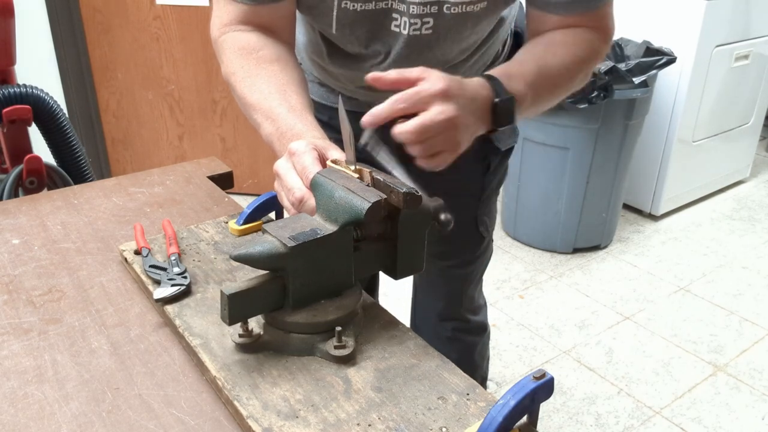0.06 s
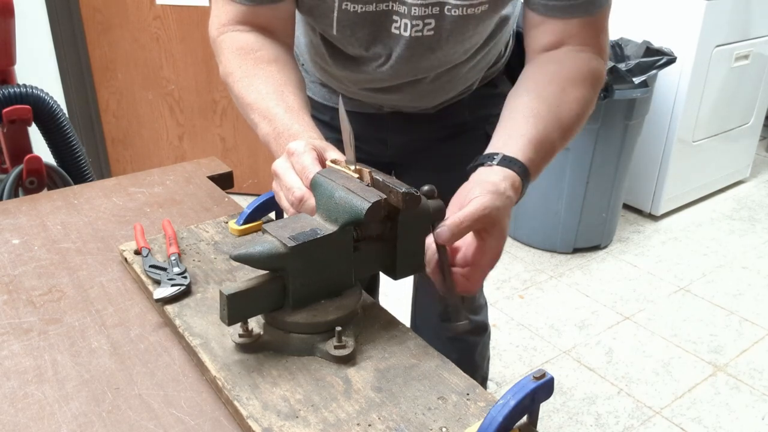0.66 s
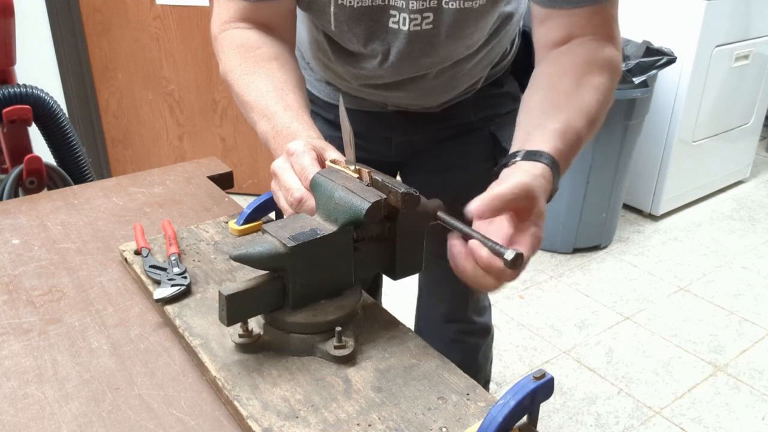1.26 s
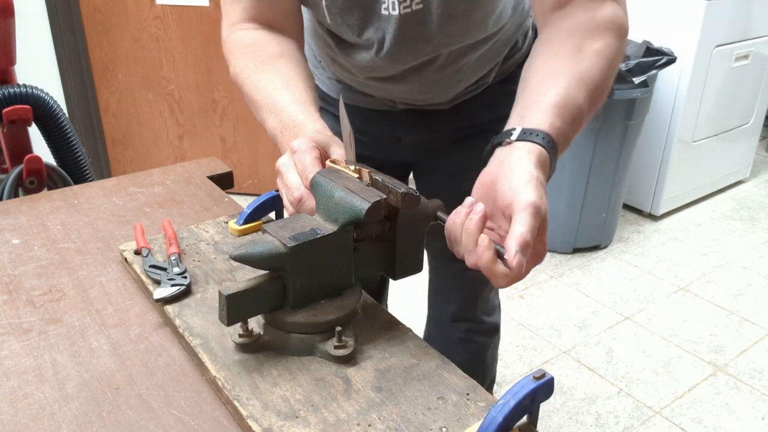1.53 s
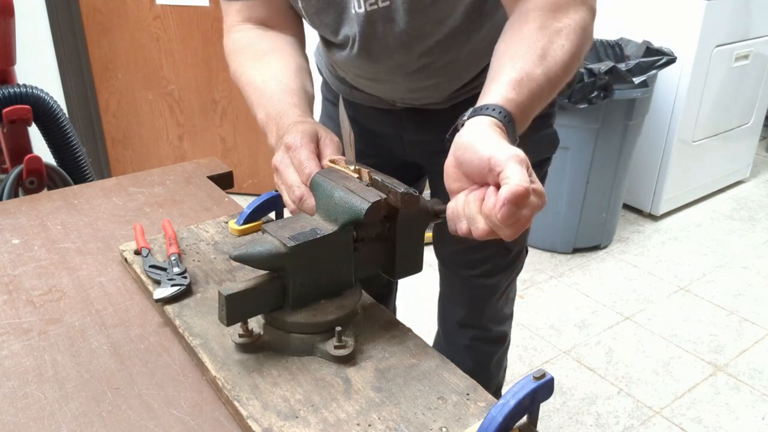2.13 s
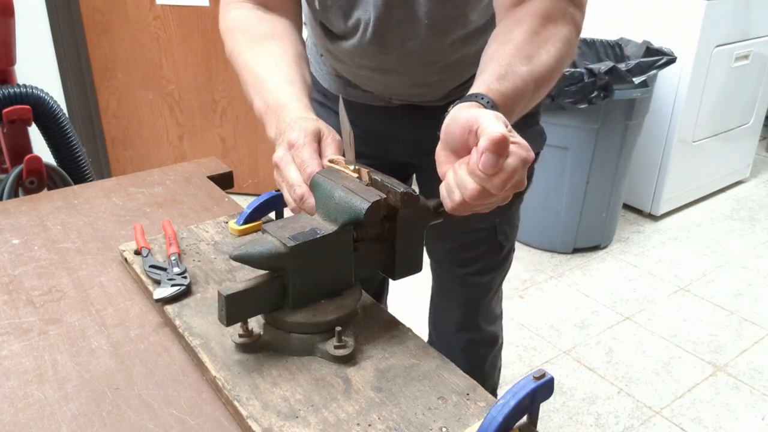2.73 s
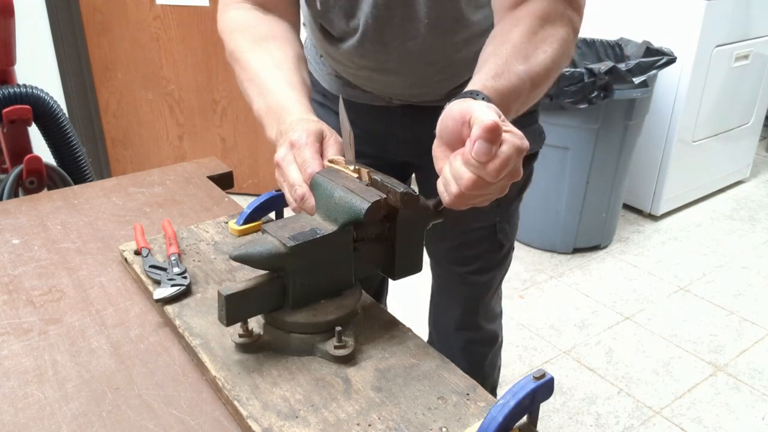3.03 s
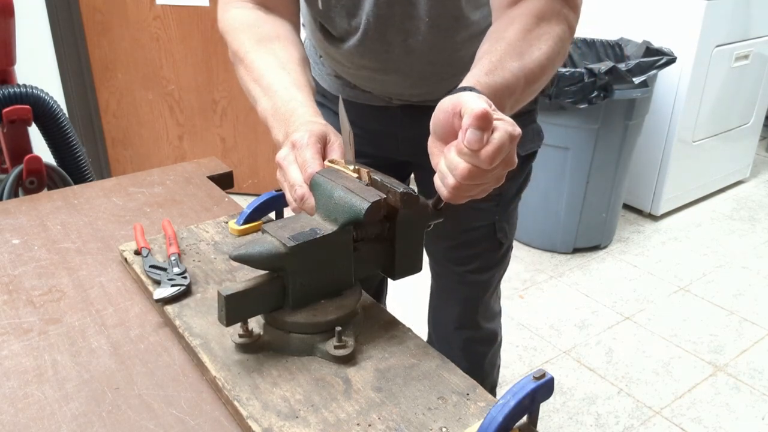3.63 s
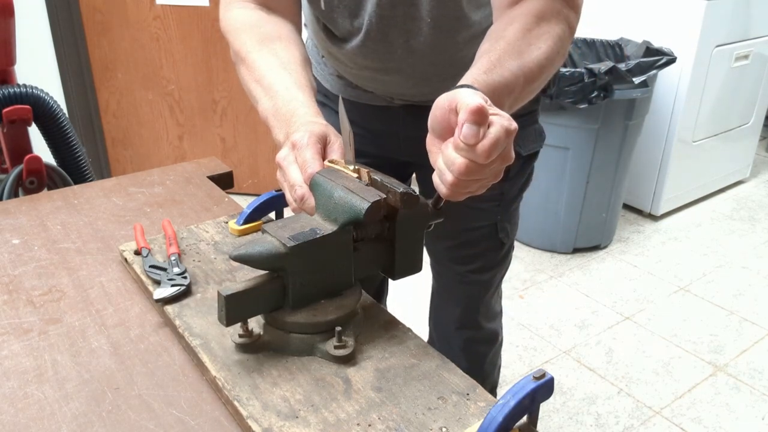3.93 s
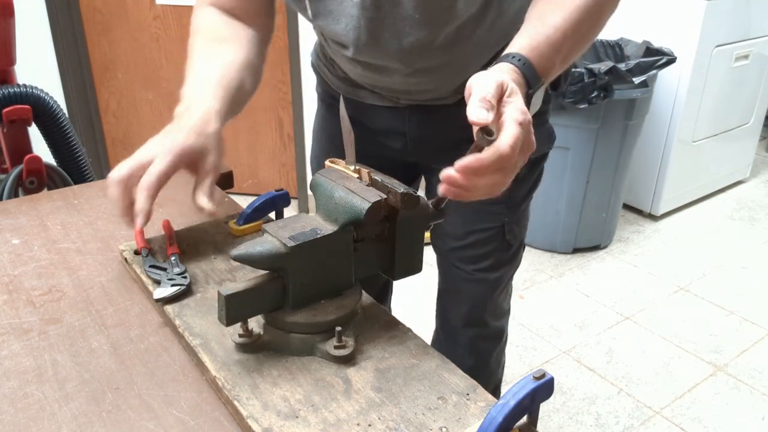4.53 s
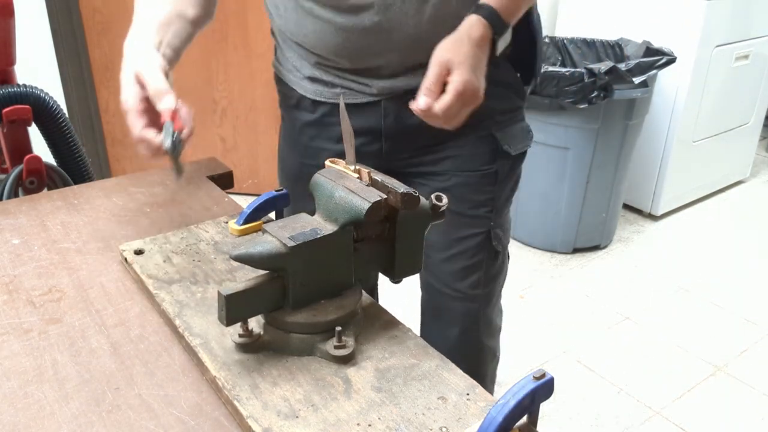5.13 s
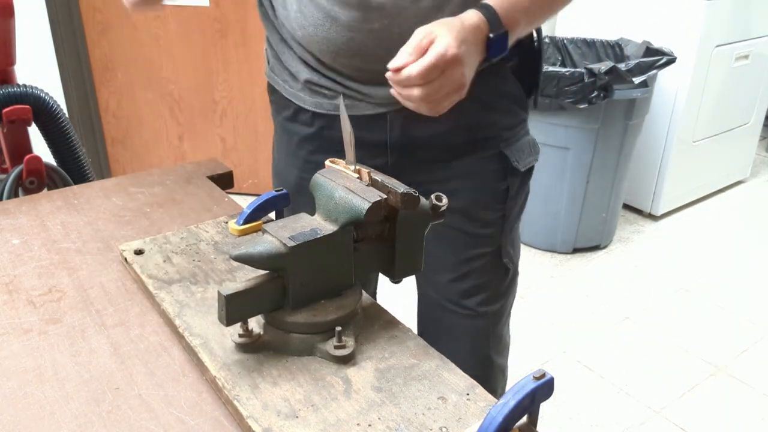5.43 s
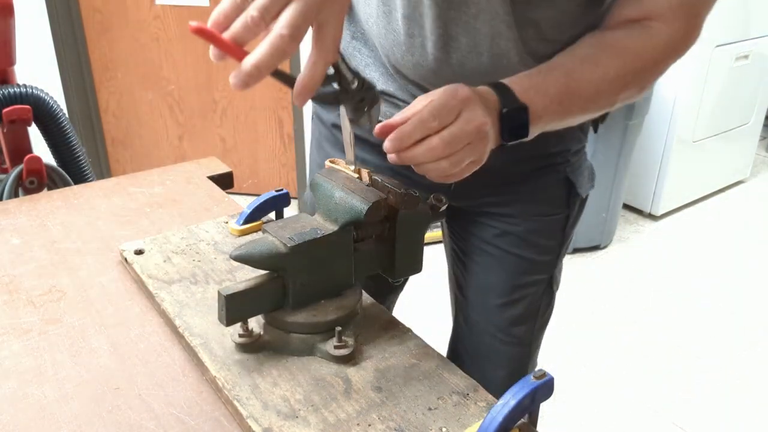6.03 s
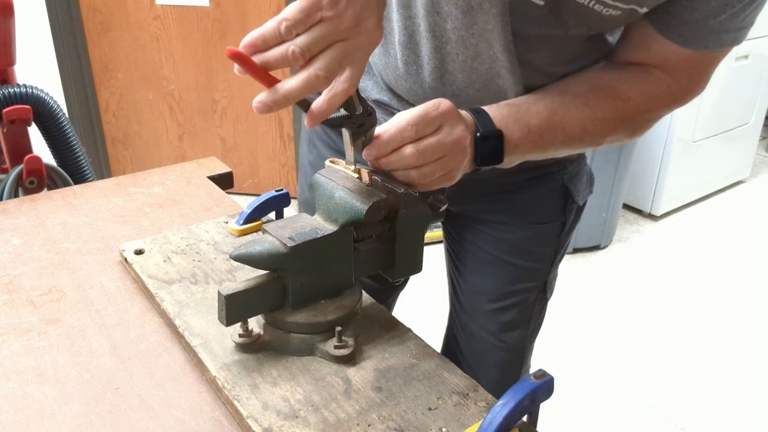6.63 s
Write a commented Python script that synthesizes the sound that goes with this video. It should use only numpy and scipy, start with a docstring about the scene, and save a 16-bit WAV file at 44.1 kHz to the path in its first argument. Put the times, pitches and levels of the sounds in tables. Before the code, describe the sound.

A cast-iron bench vise is tightened in a small workshop with a short echo, over faint electrical hum and air noise. From the start to about 1.4 seconds, its screw knocks irregularly, with light handle clinks in the first half second and short, low judders, strongest around 0.7 and 1.1 seconds. It then turns much quieter: soft, dull bumps of the vise on its wooden board are scattered from 1.7 to 4.7 seconds, with one very brief, high squeak at 2.3 seconds. From about 4.6 seconds the steel handle scrapes through its hole, ringing slightly, and hits its stop just before 5 seconds with a loud, bright clang and a knock. From 5.3 seconds, pliers rub faintly as they are handled, then make several light steel clicks against the clamped knife blade between about 6.2 and 6.9 seconds.

```python
"""A small workshop: a knife is clamped in a cast-iron bench vise, over faint mains hum and air noise.
Hands shift on the vise. The screw knocks in its slack, judders as it sticks and slips, and squeaks once.
The loaded vise bumps on its board; the steel handle scrapes through its hole and clangs on its stop.
Pliers are then picked up, rub, and click against the blade.
Contact forces drive each object's modes; the room adds a short diffuse echo."""
import sys
import numpy as np
from scipy import signal
from scipy.fft import rfft, irfft
from scipy.io import wavfile
from scipy.ndimage import uniform_filter1d

SR = 44100
rng = np.random.default_rng(int(sys.argv[2]) if len(sys.argv) > 2 else 0)


def put_to_file(sound):
    """Save the sound as 16-bit audio at rate SR, in the file named by the first command-line argument."""
    columns = np.atleast_2d(sound).T  # one column per channel
    safe = np.clip(columns, -1, 1)
    whole_steps = np.round(safe * 32767)
    wavfile.write(sys.argv[1], SR, whole_steps.astype(np.int16))


N = 302967
T = np.arange(int(.7 * SR)) / SR  # time within one event [s]

# hand pressure on the vise: (time [s], relative level [dB])
HAND_LEVELS = [(0, -45), (0.55, -73.5), (0.95, -53), (1.349, -53.5), (1.598, -66.5), (2.752, -71),
               (3.35, -75), (3.7, -83), (4.22, -74), (4.35, -65.5), (4.55, -62.5), (4.8, -43.5),
               (5.2, -63.5), (6.1, -81)]
# impacts: (time [s], relative strength [dB], hardness = edge over body [dB])
VISE_KNOCKS = [(0.010, -30.5, -23), (0.112, -42, -33), (0.157, -43, -31), (0.193, -24, -8),
               (0.212, -22.5, -10.5), (0.228, -30, -31), (0.248, -22.5, -19), (0.287, -31.5, -29),
               (0.534, -29.5, -33), (0.572, -43, -28), (0.780, -15, -11.5), (0.827, -17, -19.5),
               (1.061, -15, -3.5), (1.391, -25, -14), (4.383, -50, 2.5), (4.953, -16.5, 2),
               (4.963, -14.5, -22.5)]
HANDLE_CLANGS = [(0.212, -33.5, -5), (0.350, -41, -14), (0.412, -29.5, -4.5), (4.963, -13.5, 5)]
BOARD_BUMPS = [(1.741, -52, -11), (2.040, -56.5, -11), (2.097, -56.5, -9), (2.280, -62.5, -27),
               (2.316, -60, 11), (2.757, -59.5, -20), (3.123, -63, -17.5), (3.202, -46.5, -8.5),
               (3.294, -55, -23.5), (3.418, -52.5, -20), (4.277, -63, -24), (4.439, -47, -6),
               (4.691, -42, -34.5), (4.724, -37, -24)]
STEEL_CLICKS = [(4.333, -70.5, 17.5), (5.494, -43.5, -20), (5.840, -59.5, 25), (5.882, -55.5, 19.5),
                (6.165, -46.5, -26.5), (6.445, -40, 4), (6.456, -36, -11), (6.621, -45.5, -5.5),
                (6.851, -43.5, -3.5)]
# stick-slip bursts: (time [s], length [s], slip rate [Hz], thump [dB], body [dB], edge [dB])
SCREW_JUDDERS = [(0.259, 0.042, 148, -19.5, -30.5, -41), (0.591, 0.039, 177, -32, -62, -76.5),
                 (0.71, 0.13, 162, -9, -20.5, -30), (1.052, 0.047, 225, -14.5, -9.5, -21),
                 (4.564, 0.061, 295, -41.5, -63, -72)]
# friction strokes: (time [s], length [s], strength [dB], hardness [dB])
RUB_STROKES = [(1.284, 0.087, -81.5, 14), (5.287, 0.53, -64.5, 1), (6.157, 0.08, -57.5, -0.5),
               (6.715, 0.05, -55.5, -18.5)]
# ringing modes: (frequency [Hz], relative level [dB], t60 [s])
VISE_MODES = [(166, 0, .07), (231, -3, .08), (293, -8, .08), (439, -4, .16), (562, -12, .1), (622, -16, .1),
              (790, -16, .1), (901, -10, .13), (1055, -13, .09), (1140, -6, .13), (1324, -13, .08),
              (1567, -18, .1), (1805, -12, .08), (2100, -18, .08), (2719, -24, .1)]
HANDLE_MODES = [(1080, -7, .13), (1830, -7, .14), (2548, -9, .15), (2900, -12, .16), (4452, -14, .12),
                (4989, -8, .22), (5030, -9, .22), (5281, -12, .18), (6986, -10, .13), (9560, -7, .14),
                (9595, -7, .14), (9650, -7, .11), (12180, -17, .1), (14865, -1, .13), (15000, 6, .17),
                (15110, -4, .1)]
BOARD_MODES = [(127, -7, 0.051), (165.1, 6.5, .1), (215, -5.5, 0.48), (302, -6.5, 0.027), (590, -1, 0.34),
               (643, -19.5, 0.32)]
PLIERS_MODES = [(401.4, -14.5, 0.094), (947, 1.5, 0.11), (1500, -11, 0.14), (1514, -4, 0.11),
                (1782, 5.5, 0.017), (3770, -48, 0.026), (6400, -3, 0.065), (8800, -35, .06),
                (10300, 8.5, 0.042), (14600, -24, .05), (15200, 20, 0.047)]
HELD_BAR_MODES = [(1046, 12.5, 0.095), (2316, -0.5, 0.045), (2800, -4, .06), (4908, -19, .2),
                  (5250, -19.5, 0.26), (5900, -18.5, 0.26), (7180, -19, 0.065), (9590, -19, 0.11),
                  (12300, -23, .04), (15050, -7, .08)]
# spectra of the dense, short-lived modes: (frequency [Hz], relative density [dB])
VISE_SPECTRUM = [(40, -50.5), (75, -33.5), (112, -13.5), (163, -2.5), (270, -4), (370, -20.5), (450, -15),
                 (720, -10.5), (920, -7.5), (1400, -13.5), (1900, -20.5), (3000, -29), (3900, -28.5),
                 (6500, -39.5), (16000, -63)]
HANDLE_SPECTRUM = [(30, -24), (60, -2), (230, 2), (450, -13.5), (700, -13.5), (1100, -8), (1850, -9),
                   (3000, -16.5), (5200, -11), (8200, -20.5), (10000, -19.5), (13000, -23), (15000, -12),
                   (16000, -24)]
BOARD_SPECTRUM = [(30, -26), (60, -5.5), (110, 1), (170, 1.5), (250, -3), (390, -18.5), (520, -6),
                  (700, -15), (1000, -18.5), (2000, -31.5), (4500, -37.5), (16000, -41)]
PLIERS_SPECTRUM = [(35, -56), (60, -23), (301, -33), (417, -6.5), (715, -18), (991, 1), (1380, -1),
                   (1820, -18), (3420, -7), (5330, -6.5), (9350, -4), (10300, -11), (13600, 1),
                   (14900, -10.5), (16000, -41)]
SLIDE_SPECTRUM = [(24, -49), (40, -14), (115, -19.5), (163, 8.5), (225, -1.5), (305, -4), (382, -19.5),
                  (810, -26.5), (1020, -16), (1440, -21), (2380, -17), (3300, -31.5), (10700, -42.5),
                  (14800, -36), (16000, -38.5)]
# air noise: (frequency [Hz], relative density [dB])
AIR_SPECTRUM = [(15, -55.5), (25, -21.5), (43, -5), (64, -6.5), (89, -12), (123, -1.5), (190, -33),
                (1190, -34), (1290, -22), (1400, -36.5), (2050, -31.5), (2610, -32), (16000, -35)]
# appliance hum: (frequency [Hz], rms level [dB])
HUM_TONES = [(59.2, -73.5), (118.4, -69.5), (1281, -87)]
# room decay: (frequency [Hz], t60 [s])
ROOM_T60 = [(100, 0.5), (260, 0.25), (700, 0.33), (1840, 0.38), (4850, .38), (9200, 0.36), (15000, 0.11)]


def amp(db):
    """Decibels to gain."""
    return 10 ** (np.asarray(db) / 20)


def unit_energy(x):
    """Scale to energy 1."""
    return x / np.sqrt(np.sum(x ** 2) + 1e-20)


def unit_rms(x):
    """Scale to rms 1."""
    return unit_energy(x) * np.sqrt(len(x))


def lookup(points, hz):
    """Interpolate over log frequency."""
    point_hz, values = np.transpose(points)
    return np.interp(np.log(hz + 1), np.log(point_hz + 1), values)


def add(mix, start_s, sound):
    """Add a sound to the mix in place."""
    part = mix[max(round(start_s * SR), 0):][:len(sound)]
    part += sound[:len(part)]


def noise(spectrum, size):
    """Shaped noise, rms 1."""
    gain = amp(lookup(spectrum, np.fft.rfftfreq(size, 1 / SR)))
    return unit_rms(irfft(rfft(rng.standard_normal(size)) * gain, size))


def ring(modes):
    """Decaying sines, each building up over its first cycle; energy 1."""
    return unit_energy(sum(amp(db - 60 * T / t60_s) * np.sin(2 * np.pi * (hz * T + rng.random()))
                           * (1 - np.exp(-(hz * T) ** 2)) for hz, db, t60_s in modes))


def decay(x, t60_points):
    """Decay each band at its own rate."""
    hz, t, bands = signal.stft(x, SR, nperseg=256)
    gain = amp(-60 * t / lookup(t60_points, hz)[:, None])
    return signal.istft(bands * gain, SR, nperseg=256)[1][:len(x)]


def room(x, wet_db, build_s=0.0088):
    """Direct sound plus diffuse echo."""
    tail = decay(rng.standard_normal(len(T)), ROOM_T60) * (1 - np.exp(-(T / build_s) ** 2))
    return x + amp(wet_db) * signal.fftconvolve(x, unit_energy(tail))[:len(x)]


def body(spectrum, modes, ring_db, t60_s):
    """Impulse response: dense modes (t60_s at 150 Hz and 8 kHz) plus a few clear ones."""
    dense = decay(noise(spectrum, len(T)), [(150, t60_s[0]), (8000, t60_s[1])])
    return unit_energy(dense) + amp(ring_db) * ring(modes)


def band_levels(strength_db, hard_db, thump_db, cushion):
    """Thump, body, edge [dB]: hard contacts favour the edge, soft ones the bench."""
    return strength_db + thump_db - cushion * hard_db, strength_db, strength_db + hard_db


def balance(x, levels_db, thump_hz=350, edge_hz=2500, bench_rise_s=0.0078):
    """Set the peak 15 ms rms of bench thump, body and contact edge."""
    bands = [(thump_hz, "low"), ([thump_hz, edge_hz], "band"), (edge_hz, "high")]
    parts = [signal.sosfilt(signal.butter(3, hz, kind, fs=SR, output="sos"), x) for hz, kind in bands]
    parts[0] *= 1 - np.exp(-T / bench_rise_s)
    return sum(amp(db) * part / np.sqrt(uniform_filter1d(part ** 2, size=660).max())
               for db, part in zip(levels_db, parts))


def impacts(rows, spectrum, modes, gain_db, ring_db, t60_s, rattle_db, rattle_s, wet_db,
            thump_db, cushion):
    """Each impact: a first touch, then a quick rattle as the parts seat."""
    out = np.zeros(N)
    age = T / rattle_s
    for start_s, strength_db, hard_db in rows:
        contacts = rng.standard_normal(len(T)) * (rng.random(len(T)) < 2500 / SR)
        force = amp(rattle_db) * unit_energy(contacts * np.sqrt(age) * np.exp(-age))
        force[0] += 1
        sound = signal.fftconvolve(force, body(spectrum, modes, ring_db, t60_s))[:len(T)]
        levels_db = band_levels(strength_db, hard_db, thump_db, cushion)
        add(out, start_s, balance(room(sound, wet_db), levels_db))
    return amp(gain_db) * out


def hum_and_air(air_db=-69.5):
    """Steady appliance hum and faint air noise."""
    t = np.arange(N) / SR
    hum = sum(np.sqrt(2) * amp(db) * np.sin(2 * np.pi * (hz * t + rng.random())) for hz, db in HUM_TONES)
    return hum + amp(air_db) * noise(AIR_SPECTRUM, N)


def hands(gain_db=-2, uneven_db=6.5):
    """Uneven hand pressure makes the bench mutter."""
    level_db = np.interp(np.arange(N) / SR, *np.transpose(HAND_LEVELS))
    pressure = noise([(1, 0.5), (18, 10.0), (60, -63.0), (200, -150)], N)
    return noise(BOARD_SPECTRUM, N) * amp(gain_db + level_db + uneven_db * pressure)


def vise_knocks():
    """Knocks that ring the vise: the screw and jaw in their slack, and later the heavy blow of the handle
    reaching its stop, which thumps the bench."""
    return impacts(VISE_KNOCKS, VISE_SPECTRUM, VISE_MODES, gain_db=-5, ring_db=-9.5,
                   t60_s=(0.078, 0.056), rattle_db=1.5, rattle_s=0.01, wet_db=-10,
                   thump_db=-10.5, cushion=0.66)


def handle_clangs(flight_at_0db_s=0.075, bounce_gain_db=0.46):
    """The handle hits its stop and rebounds twice; harder hits fly longer."""
    hits = [(start_s + k * flight_at_0db_s * amp(db), db + k * bounce_gain_db, hard_db)
            for start_s, db, hard_db in HANDLE_CLANGS for k in range(3)]
    return impacts(hits, HANDLE_SPECTRUM, HANDLE_MODES, gain_db=-5.5, ring_db=-0.5,
                   t60_s=(0.025, 0.049), rattle_db=0.5, rattle_s=0.003, wet_db=-7,
                   thump_db=-4, cushion=1.0)


def screw_judder(jitter=0.04, uneven_db=2, grit=0.04, attack_s=0.03, release_s=0.0089):
    """The dry screw sticks and slips in a fast, near-regular train, shaking vise and bench."""
    out = np.zeros(N)
    for start_s, length_s, rate_hz, thump_db, body_db, edge_db in SCREW_JUDDERS:
        slip_s = (np.cumsum(1 + jitter * rng.standard_normal(40)) - .5) / rate_hz
        slips = np.zeros(len(T))
        slips[(np.clip(slip_s, 0, .5) * SR).astype(int)] = amp(uneven_db * rng.standard_normal(40))
        envelope = np.clip(np.minimum(T / attack_s, (length_s - T) / release_s), 0, 1) ** 2
        force = (slips - rate_hz / SR + grit * rng.standard_normal(len(T))) * envelope
        response = body(VISE_SPECTRUM, VISE_MODES, ring_db=-6.5, t60_s=(0.08, 0.056))
        sound = room(signal.fftconvolve(force, response)[:len(T)], wet_db=-12.5)
        dull_db = 37.5 * np.abs(np.minimum(T / length_s, 1) - 0.52)  # brightest near mid-burst
        add(out, start_s, balance(sound, (thump_db, body_db, edge_db - dull_db)))
    return out


def rubs(grain_db=3):
    """Skin and steel rub: short strokes of fine friction that swell and fade."""
    out = np.zeros(N)
    for start_s, length_s, strength_db, hard_db in RUB_STROKES:
        grains = amp(grain_db * rng.standard_normal(len(T))) * rng.standard_normal(len(T))
        force = grains * np.sin(np.pi * np.minimum(T / length_s, 1))
        response = body(PLIERS_SPECTRUM, PLIERS_MODES, ring_db=-30, t60_s=(0.0111, 0.0029))
        sound = room(signal.fftconvolve(force, response)[:len(T)], wet_db=-4)
        add(out, start_s, balance(sound, band_levels(strength_db, hard_db, thump_db=-10.5, cushion=0.46)))
    return out


def board_bumps():
    """The loaded vise bumps dully on its board."""
    return impacts(BOARD_BUMPS, BOARD_SPECTRUM, BOARD_MODES, gain_db=-7.5, ring_db=-13.5,
                   t60_s=(0.037, 0.015), rattle_db=3, rattle_s=0.0057, wet_db=-7,
                   thump_db=8.5, cushion=0.08)


def screw_squeak(start_s=2.316, attack_s=0.01518, hold_s=0.026, release_s=0.018,
                 high_hz=9122, low_hz=6810, rise_hz_per_s=7000, base_db=-22.5, swell_db_per_s=273):
    """Steel on steel sings at a high mode and a faint lower one; pitch and level climb with load."""
    held_s = np.clip(T - attack_s, 0, hold_s)
    cycles = np.cumsum(high_hz + rise_hz_per_s * held_s) / SR
    tone = np.sin(2 * np.pi * cycles) + amp(-29) * np.sin(2 * np.pi * cycles * low_hz / high_hz)
    fade_db = 50 * (np.maximum(1 - T / attack_s, 0) + np.maximum(T - attack_s - hold_s, 0) / release_s)
    envelope = amp(base_db + swell_db_per_s * held_s - fade_db)
    out = np.zeros(N)
    add(out, start_s, room(np.sqrt(2) * tone * envelope, wet_db=-11.5))
    return out


def steel_clicks():
    """Light steel contacts: the handle, then pliers on the blade."""
    return impacts(STEEL_CLICKS, PLIERS_SPECTRUM, PLIERS_MODES, gain_db=-3, ring_db=2,
                   t60_s=(0.061, 0.018), rattle_db=1, rattle_s=0.0046, wet_db=-7,
                   thump_db=-9, cushion=0.053)


def handle_slide(start_s=4.641, stop_s=4.95, attack_s=0.075, force_db=-39.5, grain_db=4,
                 sing_peak_s=4.86, sing_width_s=0.028, catch_rate_hz=2000):
    """Small catches along the sliding bar scrape the vise and make the bar sing."""
    t = start_s + T
    scrape_db = force_db - 30 * np.maximum(1 - T / attack_s, 0)
    sing_db = scrape_db - 9 + 13.5 * np.exp(-((t - sing_peak_s) / sing_width_s) ** 2)
    catches = amp(grain_db * rng.exponential(1, len(T))) * rng.choice([-1, 1], len(T))
    catches *= rng.random(len(T)) < catch_rate_hz / SR
    scrape = unit_energy(body(SLIDE_SPECTRUM, HELD_BAR_MODES, ring_db=-16.5, t60_s=(0.22, 0.022)))
    out = np.zeros(N)
    for db, response in ((scrape_db, scrape), (sing_db, ring(HELD_BAR_MODES))):
        force = unit_rms(catches) * amp(db) * (t < stop_s)
        add(out, start_s, room(signal.fftconvolve(force, response), wet_db=1.5))
    return out


def scene():
    """All sources, mono."""
    return (hum_and_air() + hands() + vise_knocks() + handle_clangs() + screw_judder() + rubs()
            + board_bumps() + screw_squeak() + steel_clicks() + handle_slide())[None]


def record(dry, low_cut_hz=48, high_cut_hz=16300):
    """Small microphone: clip at full scale, lose deep bass, limit the band."""
    highpass = signal.butter(5, low_cut_hz, "high", fs=SR, output="sos")
    lowpass = signal.firwin(255, high_cut_hz, window=("kaiser", 9), fs=SR)
    thin = signal.sosfilt(highpass, np.clip(dry, -1, 1))
    return signal.oaconvolve(thin, lowpass[None], "same")


dry = scene()
out = record(dry)
put_to_file(out)
```